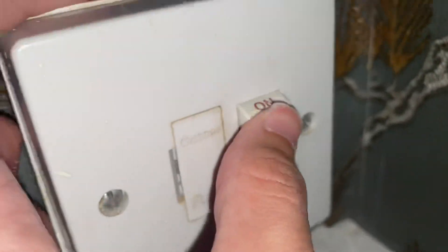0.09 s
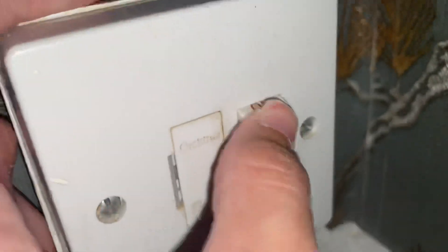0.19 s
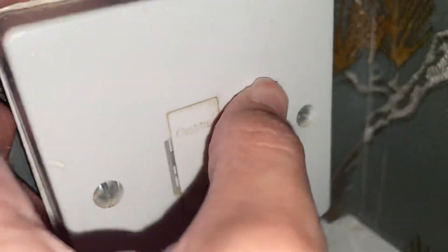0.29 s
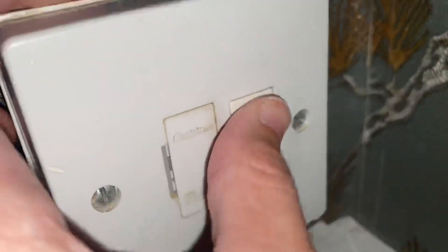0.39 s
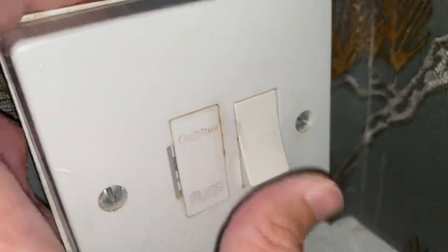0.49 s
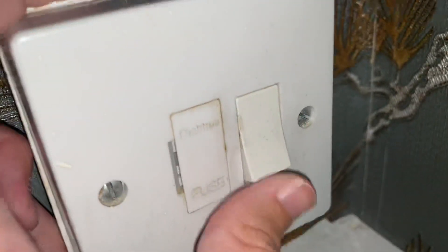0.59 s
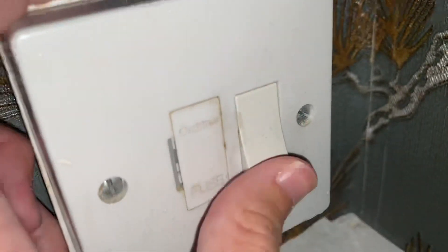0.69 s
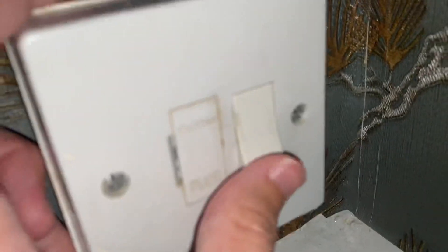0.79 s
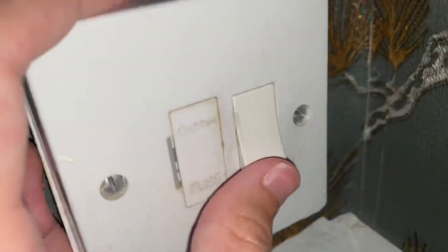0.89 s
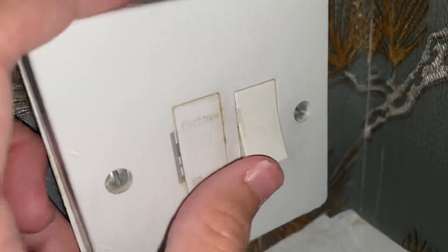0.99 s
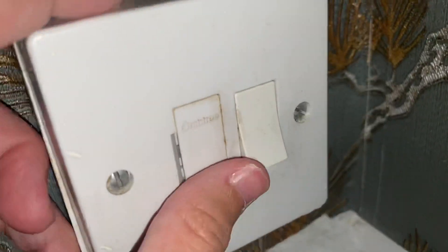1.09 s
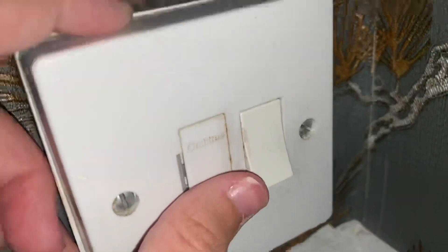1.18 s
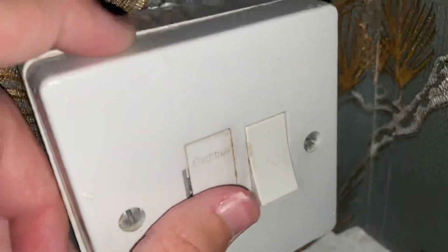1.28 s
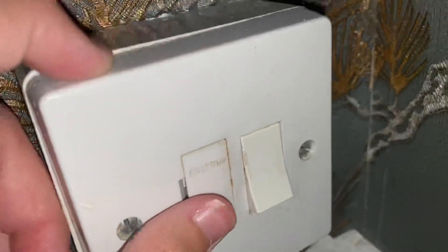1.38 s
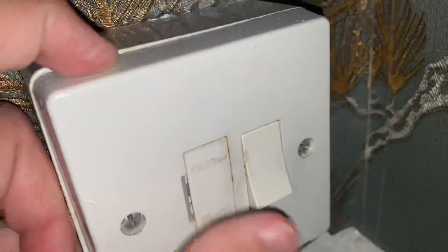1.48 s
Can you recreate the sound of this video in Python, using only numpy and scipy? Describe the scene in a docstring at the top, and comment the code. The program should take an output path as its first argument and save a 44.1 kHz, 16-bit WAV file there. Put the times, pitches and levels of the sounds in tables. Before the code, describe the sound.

A light switch snaps once, loudly, at 0.25 seconds: a bright double-contact plastic crack with a dull box thud and short room echo. A barely audible creak near 0.12, small ticks at 0.22 and a gritty scrape lead in. Afterwards, faint finger slides from 0.5, soft hollow taps around 0.8, 0.98 and 1.2, and a light scuff at 1.4, over quiet wavering mains hum and air.

```python
"""Light switch flicked by a thumb

A thumb flicks a plastic rocker switch on a hand-held wall unit, close to the microphone in a small room.
The plastic creaks and knocks, grit scrapes as filtered noise, and the snap is noise cracks plus ringing modes.
Then fingers slide (grainy hiss), tap and scuff on the housing, which rings as a set of fading sines.
A faint mains hum of wavering sines and soft air noise lie behind; a gain control ducks after the snap."""
import sys
import numpy as np
from scipy import signal
from scipy.fft import rfft, irfft, next_fast_len
from scipy.io import wavfile
from scipy.ndimage import uniform_filter1d, minimum_filter1d, map_coordinates

SR = 44100
rng = np.random.default_rng(int(sys.argv[2]) if len(sys.argv) > 2 else 0)


def generate_wav(signal):
    """Clip the signal to [-1, 1] and save it as 16-bit WAV at the path in sys.argv[1]."""
    frames = np.transpose(np.atleast_2d(signal))
    scaled = np.clip(frames, -1, 1) * 32767
    pcm = np.round(scaled).astype(np.int16)
    wavfile.write(sys.argv[1], SR, pcm)


N = 68355
TIME = np.arange(N) / SR
HIT_TIME = np.arange(SR // 8) / SR  # clock of one short hit, in seconds
PORT_LAG_S = .00025  # the right microphone port hears the hits this much before the left

# Contacts as the rocker snaps over and bounces: (t/s, level/dB, brightness/(dB/octave), crack t60/s)
CONTACTS = [(.2503, -0.5, 3, 0.012), (.2513, -1.5, -1.5, 0.013), (0.2526, -8, -2.5, 0.017)]
# Ringing modes of the hollow housing: (f/Hz, level/dB, t60/s)
HOUSING_MODES = [(320, -15.5, .04), (480, -15, 0.018), (620, -5.5, 0.045), (950, -9.5, .02),
                 (1250, -7, .02), (1598.4, -7, .015), (1800, -4.5, 0.016), (2067, -7, .014),
                 (4000, -11.5, 0.021)]
# Tone colour of the whole box when jolted: (f/Hz, relative level per Hz/dB)
BOX_COLOUR = [(40, -13.5), (120, -1.5), (200, 2), (310, 3), (520, -5.5), (700, -13), (1080, -3),
              (1600, -22), (4000, -50)]


def amp(db):
    """Turns decibels into a gain."""
    return 10 ** (np.asarray(db) / 20)


def unit(x):
    """Scales a sound to rms 1."""
    return x / np.sqrt(np.mean(x ** 2) + 1e-20)


def along(points, hz):
    """Reads a curve of (frequency, value) points at hz, on a log frequency axis."""
    f, value = np.transpose(points)
    return np.interp(np.log(hz + 1), np.log(f + 1), value)


def wobble(rate):
    """A smooth random curve through `rate` random points a second."""
    return map_coordinates(rng.standard_normal(N // 8), [TIME * rate], mode="wrap")


def filtered(x, response):
    """Shapes the spectrum of x by a gain that depends on frequency."""
    size = next_fast_len(x.shape[-1] + SR // 4)
    spectrum = rfft(x, size) * response(np.fft.rfftfreq(size, 1 / SR))
    return irfft(spectrum, size)[..., :x.shape[-1]]


def noise(spectrum, size=N, tilt=0):
    """Coloured stereo noise of rms 1, near mono in the bass; tilt brightens it, in dB per octave."""
    # How alike left and right are: (f/Hz, likeness from -1 to 1)
    likeness = [(60, 0.74), (150, 0.35), (380, .2), (950, 0.15), (2400, 0.37), (15000, -0.24)]

    def colour(hz):
        turn = np.arccos(np.clip(along(likeness, hz), -1, 1)) / 2
        gain = amp(along(spectrum, hz) + tilt * np.log2(1 + hz / 1000))
        return gain * [np.cos(turn), np.sin(turn)]

    mid, side = filtered(rng.standard_normal((2, size)), colour)
    return unit(np.array([mid + side, mid - side]))


def decay(t, t60):
    """An exponential fade that falls by 60 dB in t60 seconds."""
    return np.exp(-np.log(1000) * t / np.maximum(t60, 1e-4))


def swell(middle, half):
    """A bell-shaped rise and fall, down to about half its height `half` seconds from the middle."""
    return np.exp(-((TIME - middle) / half) ** 2 / 2 * np.sqrt(2))


def ring(modes, scatter_db):
    """Struck plastic rings in fading sines; the higher a mode, the less alike it reaches the two ports."""
    out = np.zeros((2, len(HIT_TIME)))
    for hz, db, t60 in modes:
        level, skew = rng.standard_normal((2, 2, 1))  # one of each per side
        sine = np.sin(2 * np.pi * hz * (HIT_TIME + skew * PORT_LAG_S / 2))
        out += amp(db + scatter_db * level) * decay(HIT_TIME, t60) * sine
    return out


def add(track, s, sound):
    """Mixes a short sound in at time s; it reaches the right port first."""
    for side, lag in enumerate((PORT_LAG_S / 2, -PORT_LAG_S / 2)):
        start = max(0, round((s + lag) * SR))
        part = track[side, start:][:sound.shape[1]]
        part += sound[side, :len(part)]


def background():
    """A mains hum of sines that waver in loudness and drift in phase, over still room air."""
    # Hum tones: (f/Hz, rms level before drift and waver/dB)
    hum_tones = [(100, -61), (200, -85), (300, -77.5)]
    # Tone colour of the air: (f/Hz, relative level per Hz/dB)
    air_colour = [(20, -14), (50, 3), (105, 5), (150, 2.5), (280, -9), (450, -8), (800, -13.5),
                  (1100, -7.5), (1600, -16.5), (3000, -20), (5000, -34), (10000, -42.5), (16000, -43.5)]
    waver_hz, waver_depth, waver_crest_s = 12.1, 0.69, 1.253
    drift_db, air_db = 2.5, -64.5
    waver = 1 + waver_depth * np.cos(2 * np.pi * waver_hz * (TIME - waver_crest_s))
    hum = 0
    for hz, db in hum_tones:
        level = amp(db + drift_db * wobble(23)) * np.sqrt(2)  # sine peak from rms
        phase = 2 * np.pi * (hz * TIME + rng.random()) + .3 * wobble(22)
        hum = hum + level * np.sin(phase)
    return waver * hum + amp(air_db) * noise(air_colour)


def fingers():
    """Skin sliding on plastic makes a grainy hiss; the shifting grip makes a low rumble."""
    # Sliding strokes: (middle t/s, half length/s, level/dB, brightness/(dB/octave))
    strokes = [(.01, 0.015, -67, -2.5), (.208, 0.016, -58.5, -6.5), (0.484, 0.033, -59, -0.5),
               (.54, 0.029, -69, 1), (0.641, .022, -75.5, -5), (0.745, 0.031, -72, -1), (.845, .02, -80, 6),
               (1.019, 0.048, -76.5, 2), (1.085, .024, -68.5, 6), (1.243, 0.054, -65.5, 1),
               (1.308, 0.054, -65, 2.5), (1.508, .04, -70, 0.5)]
    # Tone colour of the skin hiss: (f/Hz, relative level per Hz/dB)
    skin_colour = [(200, -10), (650, 2), (1300, -4), (2100, 1.5), (3100, -2.5), (4000, 4.5), (5000, -0.5),
                   (8000, 3), (9000, -23), (10300, 1.5), (12200, -0.5), (13200, -14), (14500, -1),
                   (16000, -10)]
    # Shifts of the grip: (middle t/s, half length/s, level/dB)
    grip_shifts = [(.78, .1, -54.5), (.97, 0.044, -61.5), (1.39, 0.092, -65)]
    # Tone colour of the rumble: (f/Hz, relative level per Hz/dB)
    rumble_colour = [(15, -4), (35, -10), (62, 5.5), (90, -1), (160, -12), (400, -40), (1500, -94)]
    grain_db, grains_per_s = 2, 500
    hiss = sum(amp(db) * swell(s, half) * noise(skin_colour, tilt=tilt) for s, half, db, tilt in strokes)
    grip = sum(amp(db) * swell(s, half) for s, half, db in grip_shifts)
    grain = unit(amp(grain_db * wobble(grains_per_s)))
    return hiss * grain + grip * noise(rumble_colour)


def scuffs():
    """A fingertip sticks and slips: irregular little kicks shake the housing."""
    # Scuffs: (middle t/s, half length/s, level/dB)
    scuff_times = [(1.4, 0.02095, -63.5), (1.31, .03, -72), (.83, 0.022, -75.5)]
    slips_per_s = 230
    slips = (rng.random((2, N)) < slips_per_s / SR) * rng.standard_normal((2, N))
    shaken = signal.fftconvolve(slips, ring(HOUSING_MODES, scatter_db=1.5), axes=1)[:, :N]
    return unit(shaken) * sum(amp(db) * swell(s, half) for s, half, db in scuff_times)


def taps():
    """Loose plastic parts tick and knock the housing; soft fingertips knock it more dully."""
    # Taps: (t/s, knock level/dB, knock brightness/(dB/octave), tick level/dB)
    tap_times = [(.006, -56, -11, -64), (.2200, -43, 5, -32.5), (0.2213, -30, 1.5, -47.5),
                 (.698, -60.5, -12, -85), (.816, -58.5, -7.5, -58.5), (.9715, -58, -1, -65),
                 (0.9827, -48.5, -3.5, -54), (1.0106, -56.5, -5, -82), (1.212, -57, -4, -77),
                 (1.234, -61, -2, -70), (1.314, -57, -6.5, -72.5), (1.468, -64, 2, -61)]
    # Tone colour of a tick: (f/Hz, relative level per Hz/dB)
    tick_colour = [(200, -10), (1500, 4), (4000, -1.5), (6000, -9.5), (8200, -1.5), (9500, -15.5),
                   (12000, -11), (16000, -29)]
    tick_t60_s = 0.024
    body_db, body_t60_s = -9, .02  # thump of the box; duller knocks get more of it
    out = np.zeros((2, N))
    soft_start = 1 - decay(HIT_TIME, 0.0017)
    for s, knock_db, tilt, tick_db in tap_times:
        tick = noise(tick_colour, len(HIT_TIME)) * decay(HIT_TIME, tick_t60_s)
        modes = [(hz, level + tilt * np.log2(hz / 1000), t60) for hz, level, t60 in HOUSING_MODES]
        body = noise(BOX_COLOUR, len(HIT_TIME), tilt=3.7) * decay(HIT_TIME, body_t60_s)
        knock = ring(modes, scatter_db=1.5) + amp(body_db - tilt) * body
        add(out, s, amp(knock_db) * knock * soft_start + amp(tick_db) * tick)
    return out


def creak():
    """The loaded plastic sticks and slips: a faint rough tone, sagging in pitch before the rocker moves."""
    middle_s, half_s, level_db = .12, 0.023, -69
    middle_hz, sag_hz_per_s = 414.3, 650
    hz = middle_hz - sag_hz_per_s * np.clip(TIME - middle_s, -.1, .1) + 12 * wobble(90)
    level = amp(level_db + 1.5 * wobble(70)) * swell(middle_s, half_s)
    return level * np.sin(2 * np.pi * np.cumsum(hz) / SR)


def scrape():
    """The rocker scrapes over its pivot: gritty friction that grows until it tips."""
    # Tone colour of the scrape: (f/Hz, relative level per Hz/dB)
    scrape_colour = [(150, -5.5), (700, -6.5), (1500, -2), (2900, 3.5), (4200, 4), (6000, -9), (7700, -7.5),
                     (9000, -33), (11000, -25), (16000, -31.5)]
    start_s, end_s = 0.2369, .2503
    start_db, growth_db = -36, 10.5
    travel = (TIME - start_s) / (end_s - start_s)  # 0 at the start, 1 at the end
    level_db = start_db + growth_db * np.clip(travel, 0, 1) + 2.5 * wobble(700)
    contact = np.clip(travel * 5, 0, 1) * (travel < 1)
    pan = amp(np.array([[-1], [1]]))  # 1 dB softer on the left, 1 dB louder on the right
    return noise(scrape_colour) * amp(level_db) * contact * pan


def thud():
    """The snap jolts the whole box, which answers dully just after the first contact."""
    delay_s, level_db, t60_s = 0.0026, -26.5, 0.03
    out = np.zeros((2, N))
    envelope = decay(HIT_TIME, t60_s) * (1 - decay(HIT_TIME, .004))
    jolt = amp(level_db) * noise(BOX_COLOUR, len(HIT_TIME)) * envelope
    add(out, CONTACTS[0][0] + delay_s, jolt)
    return out


def snap():
    """The spring throws the rocker against its stop: each contact cracks and rings the plate."""
    # Ringing modes of the rocker and face plate: (f/Hz, level/dB, t60/s)
    plate_modes = [(775, -24.5, .035), (1400, -25.5, 0.0086), (1640, -19.5, 0.042), (1840, -19, .022),
                   (1990, -15.5, 0.03), (2416.5, -2, .022), (2884, -10.5, 0.022), (3400, -10, .024),
                   (4497, -14.5, 0.018), (5023, -4, .018), (5680, -11.5, 0.021), (6230, -13.5, .013),
                   (6993, -9, 0.015), (7810, -5, .013), (10900, -10.5, 0.0097)]
    # Tone colour of a crack: (f/Hz, relative level per Hz/dB)
    crack_colour = [(100, -18), (330, -6.5), (550, -7), (950, -16), (1500, -1), (2400, -1), (3200, 0.5),
                    (4200, -3), (5200, 2), (7800, -4), (9000, -19.5), (10300, 4.5), (12000, -4),
                    (13000, -16.5), (14200, -9), (16000, -23)]
    crack_db, ring_db = -1, -3.5  # relative to the level of the contact
    out = np.zeros((2, N))
    for s, db, tilt, crack_t60 in CONTACTS:
        crack = noise(crack_colour, len(HIT_TIME), tilt) * decay(HIT_TIME, crack_t60)
        modes = [(hz, level + tilt * np.log2(hz / 4000), t60) for hz, level, t60 in plate_modes]
        ringing = ring(modes, scatter_db=2.0)
        add(out, s, amp(db) * (amp(crack_db) * crack + amp(ring_db) * ringing))
    return out


def room(x):
    """Echoes as fading coloured noise: near walls die away quickly, the rest of the room rings on."""
    # How long the room rings: (f/Hz, t60/s)
    room_t60 = [(200, 0.8), (1400, 0.62), (2600, 0.5658), (3150, 0.63), (3800, 0.53), (7000, .5),
                (14000, 0.15)]
    # Tone colour of the room: (f/Hz, relative level/dB)
    room_colour = [(100, 10), (230, 12.5), (500, 6), (800, 1), (1150, 4.5), (2200, -0.5), (2750, -3),
                   (3120, 4.5), (3550, -1), (4000, -2), (5500, -5), (8000, -5.5), (11000, -7), (14000, -8)]
    far_db, near_db = -24.5, -22.5
    near_t60_s, wall_delay_s = 0.11, .012
    hz, t, z = signal.stft(rng.standard_normal((2, N // 2)), SR, nperseg=256)
    z = z * amp(along(room_colour, hz))[:, None]
    far_t60_s = along(room_t60, hz)[:, None]
    answer = 0
    for db, t60 in ((far_db, far_t60_s), (near_db, near_t60_s)):
        tail = signal.istft(z * decay(t, t60), SR, nperseg=256)[1]
        answer = answer + amp(db) * tail / np.linalg.norm(tail[0])
    answer = np.pad(answer, ((0, 0), (round(wall_delay_s * SR), 0)))
    return signal.fftconvolve(x, answer, axes=1)[:, :N]


def scene():
    """The switch and its room, the creak, the fingers and the hum."""
    # keep the clicks, scrapes and knocks free of low thump; the thud brings the bass
    low_cut = signal.butter(2, 260, "highpass", fs=SR, output="sos")
    plastic = snap() + scrape() + taps() + scuffs()
    switch = signal.sosfilt(low_cut, plastic) + thud()
    return switch + room(switch) + creak() + fingers() + background()


def record(dry):
    """Gain control pulls down on loud sound, holds and recovers; then the top treble is cut off."""
    limit_db, hold_s, release_db_per_s = -13.5, 0.09, 49.5
    top_hz = 16400
    power = np.abs(uniform_filter1d(np.mean(dry ** 2, axis=0), size=220))  # over 5 ms
    cut_db = np.maximum(0, 10 * np.log10(power + 1e-12) - limit_db)
    half = int(hold_s * SR / 2)
    # keep the deepest cut of the last hold_s seconds
    held = -minimum_filter1d(-cut_db, 2 * half + 1, origin=half, mode="constant")
    # then let the cut shrink no faster than the release rate
    recovery = release_db_per_s * TIME
    released = np.maximum.accumulate(held + recovery) - recovery
    gain = amp(-uniform_filter1d(released, size=44))  # smoothed over 1 ms
    return filtered(dry * gain, lambda hz: np.clip((top_hz - hz) / 600 + .5, 0, 1))


dry = scene()
out = record(dry)
generate_wav(out)
```